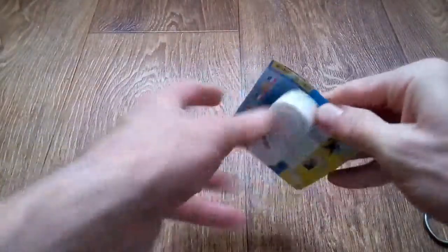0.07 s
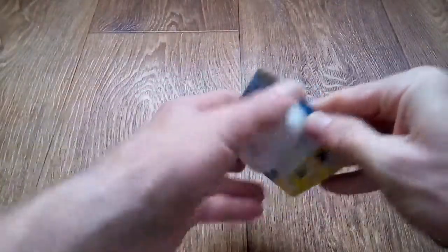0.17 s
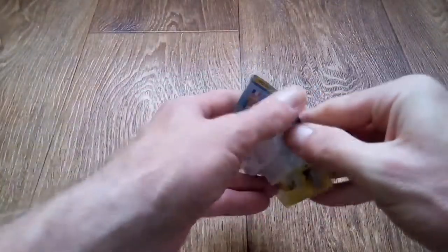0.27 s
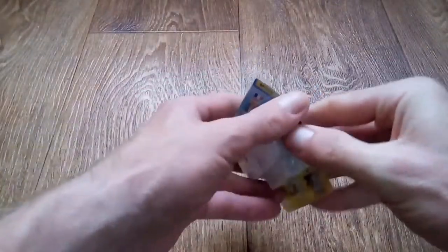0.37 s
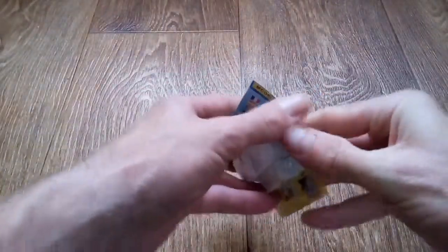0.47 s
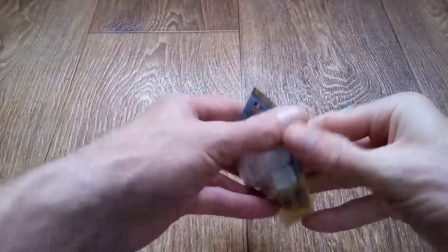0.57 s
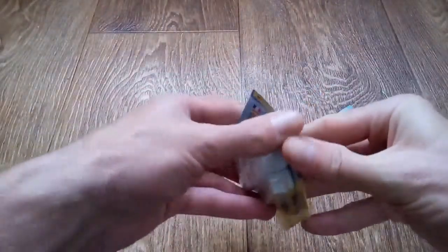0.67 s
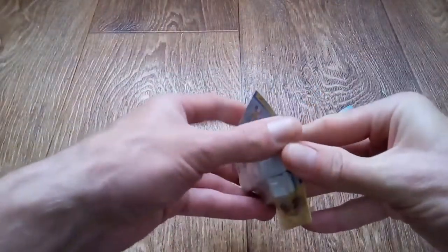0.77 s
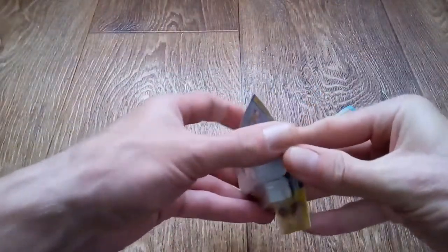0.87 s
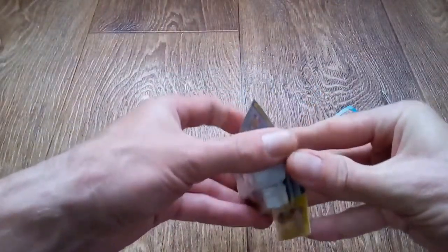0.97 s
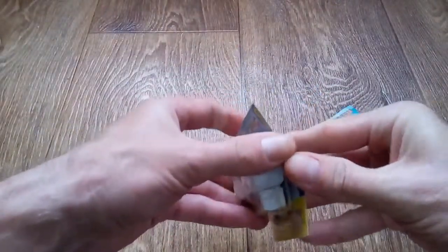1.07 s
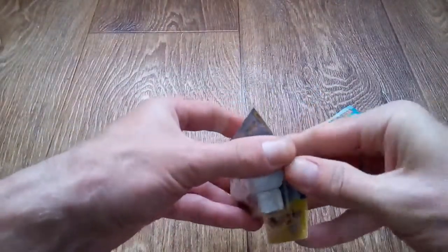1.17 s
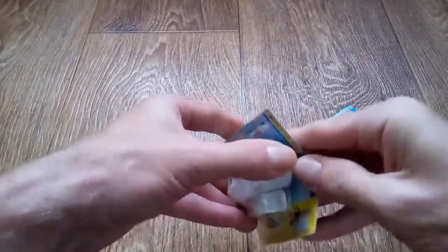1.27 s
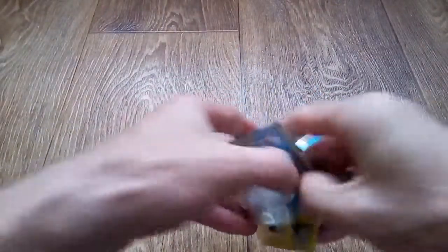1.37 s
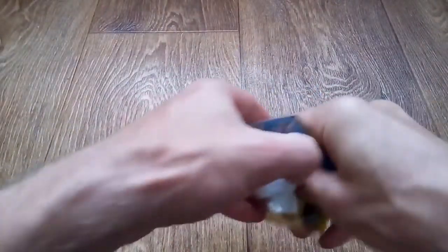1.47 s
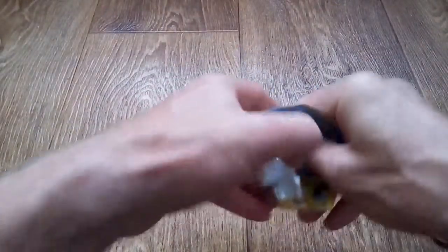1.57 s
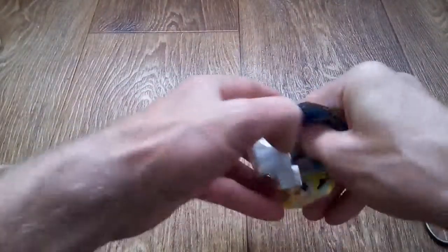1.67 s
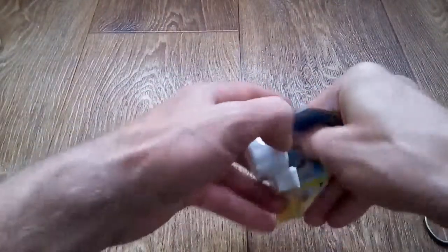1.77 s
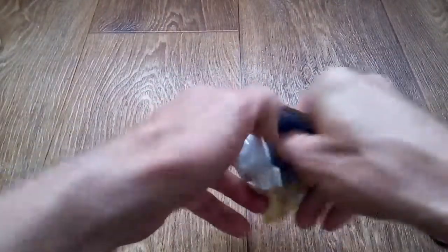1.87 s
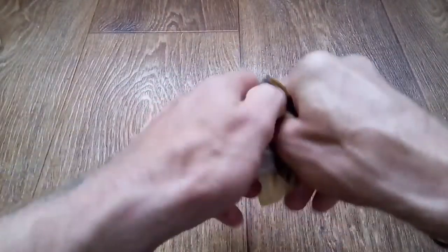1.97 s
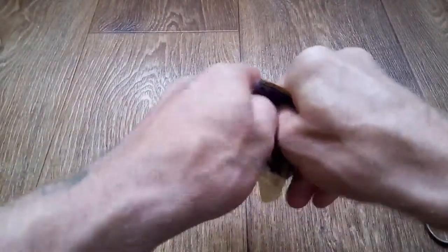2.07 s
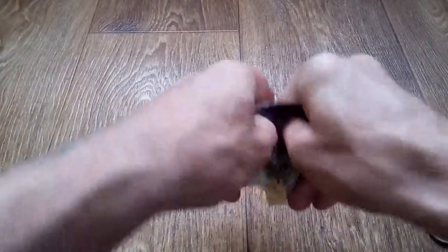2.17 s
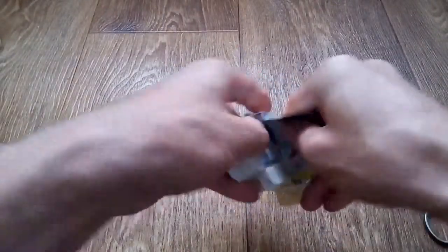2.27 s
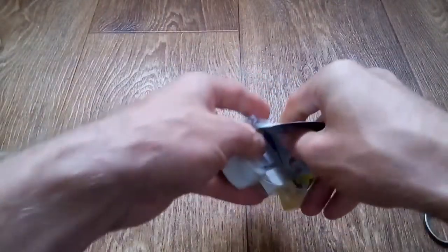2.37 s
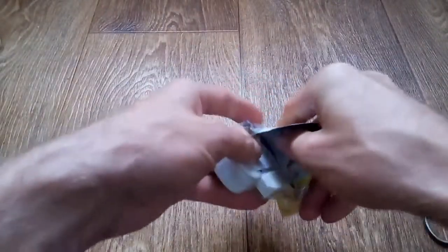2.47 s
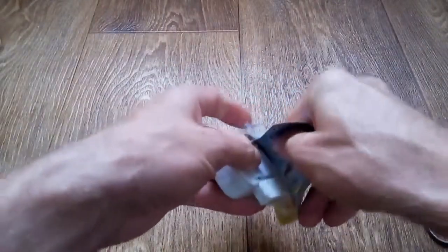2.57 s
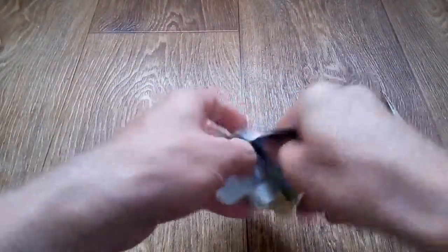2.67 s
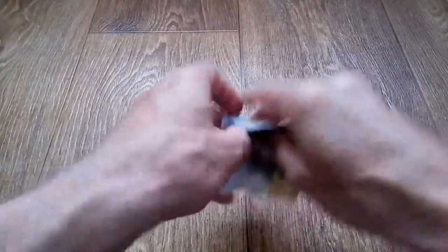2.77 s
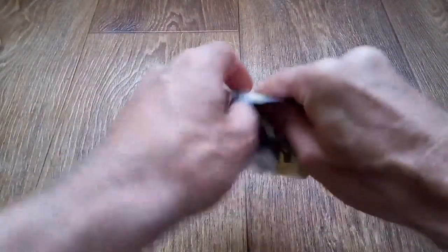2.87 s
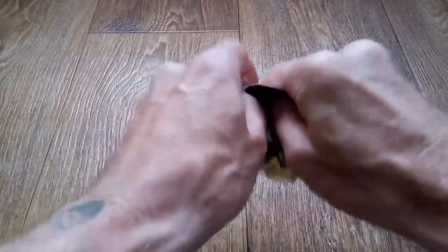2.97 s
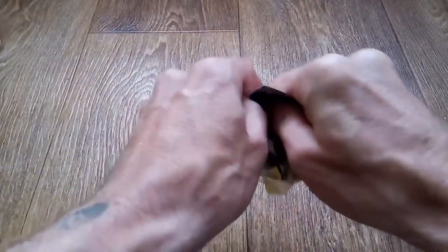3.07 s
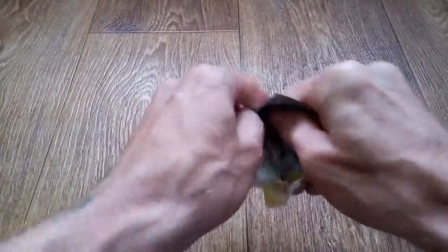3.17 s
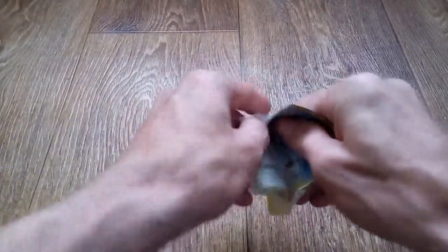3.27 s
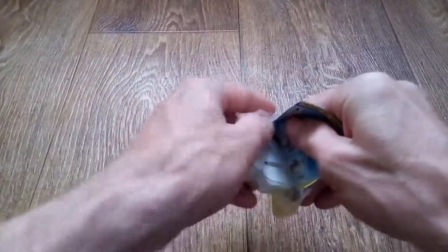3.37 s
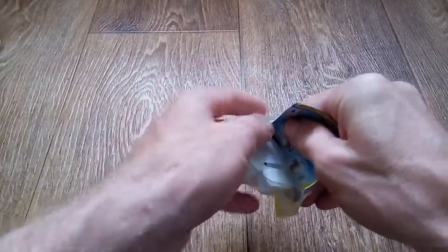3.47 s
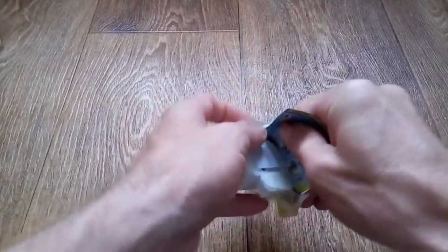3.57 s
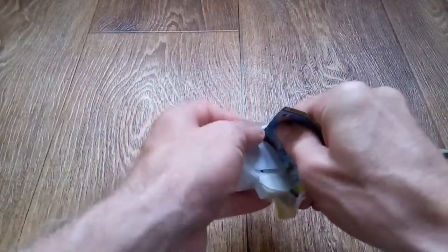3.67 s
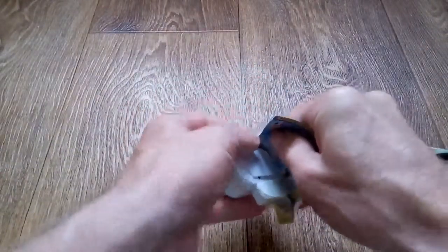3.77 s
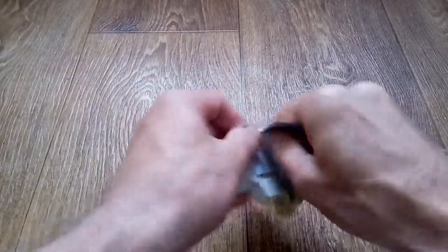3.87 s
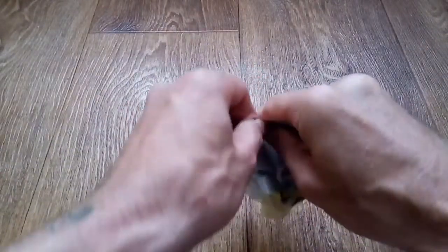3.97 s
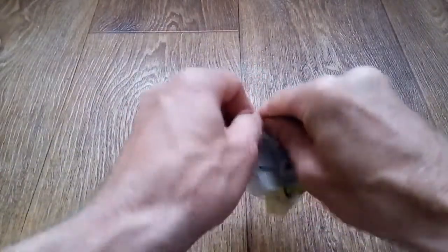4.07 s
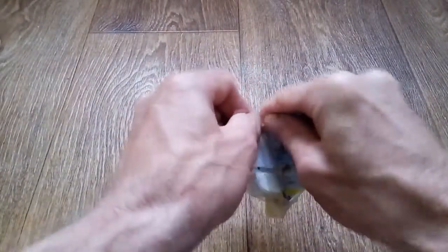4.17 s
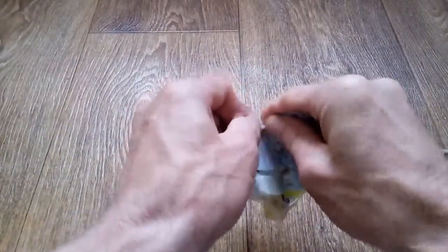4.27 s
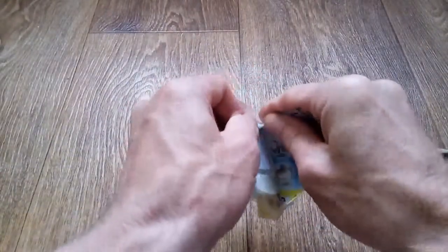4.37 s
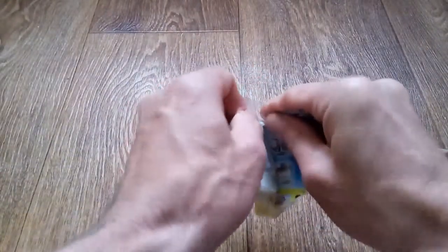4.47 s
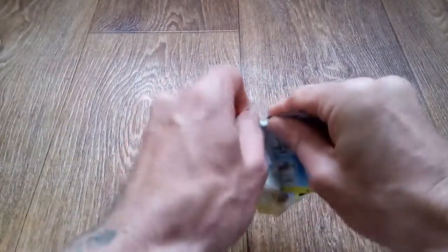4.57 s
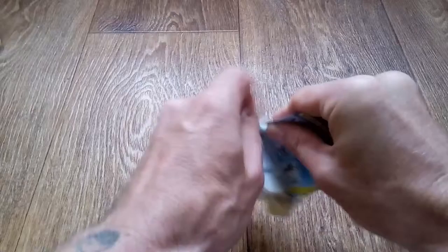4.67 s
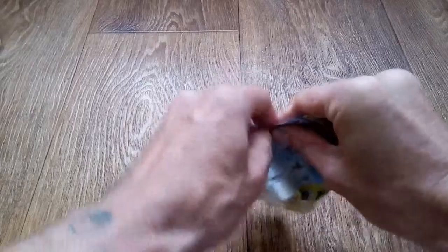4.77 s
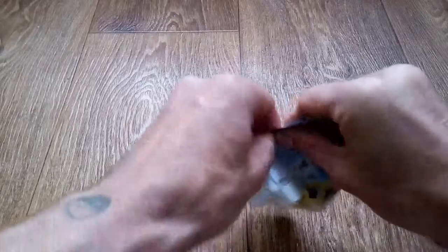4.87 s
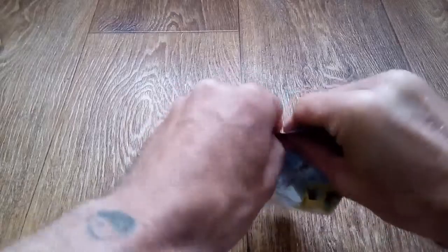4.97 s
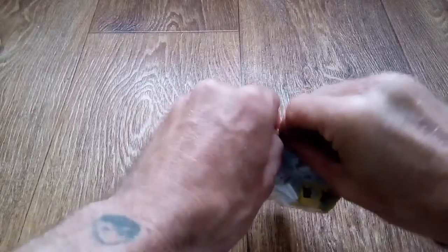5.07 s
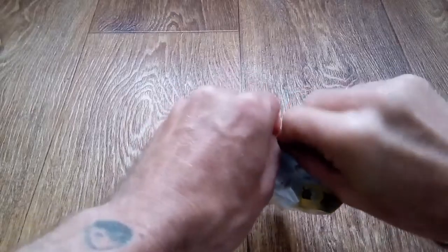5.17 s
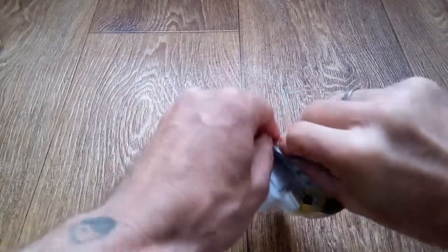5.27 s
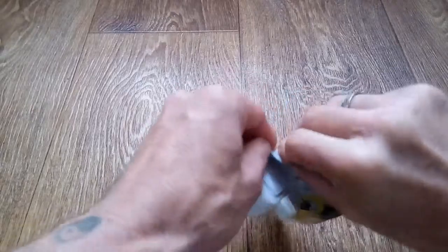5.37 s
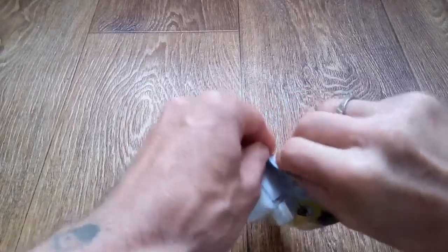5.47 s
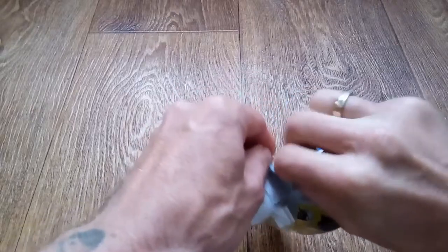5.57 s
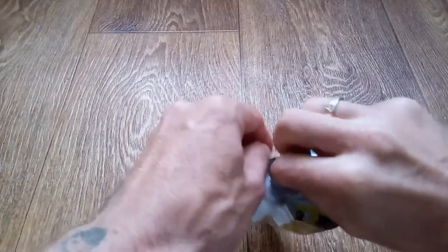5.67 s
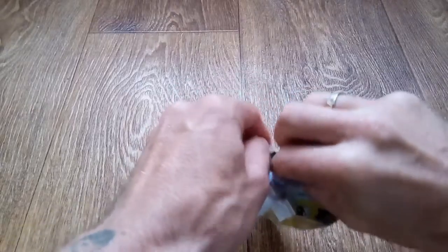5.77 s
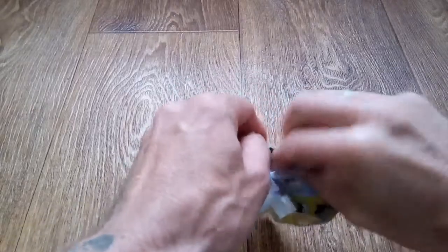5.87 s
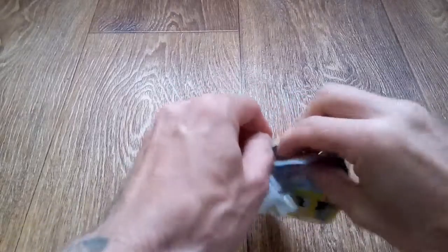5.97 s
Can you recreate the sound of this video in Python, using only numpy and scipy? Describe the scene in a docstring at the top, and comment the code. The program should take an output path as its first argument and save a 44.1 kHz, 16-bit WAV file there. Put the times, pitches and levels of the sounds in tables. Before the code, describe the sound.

Two hands pry a small plastic blister pack from its card. After a nearly silent second, bright snaps and crackles burst out, strongest just before two seconds and again near two and a half. Rustling continues, a short hissy finger slide comes after four seconds, then lighter ticks. Close small microphone, little bass, small room above a wooden floor.

```python
"""Creases of a small plastic blister pack snap as two hands pry it off its card, above a wooden floor.
Each snap is a click, a short crack and ringing panels, with a rattle and weaker snaps after it.
Fingers rub card and plastic: random slips and ticks set resonances ringing; one long slide hisses.
Low knocks are damped pushes of air. Floor and a small room answer with echoes and fading noise,
over rumble and a faint room tone made of filtered noise."""
import sys
import numpy as np
from scipy import signal
from scipy.fft import rfft, irfft
from scipy.io import wavfile
from scipy.ndimage import uniform_filter1d

SR = 44100
rng = np.random.default_rng(int(sys.argv[2]) if len(sys.argv) > 2 else 0)


def master_out(mix):
    """Clip the mix to full scale and print it as 16-bit PCM to the path in sys.argv[1]."""
    frames = np.transpose(np.atleast_2d(mix))
    ceiling = np.clip(frames, -1, 1)
    pcm = np.round(ceiling * 32767).astype(np.int16)
    wavfile.write(sys.argv[1], SR, pcm)


N = 265482  # length in samples

# Snaps of a crease. Each row: start in seconds, panel level in dB, panel pitch in Hz,
# crack level in dB, crack pitch in Hz, level of the sizzle above 8 kHz in dB.
CREASE_SNAPS = [(0.125,-59,596,-49,5500,-69),(0.218,-44,2100,-34.5,4280,-45),(0.477,-62,3400,-33.5,5200,-48),(0.484,-42.5,1940,-38,5100,-55),(0.577,-53,2140,-44,4640,-57),(0.657,-73,3740,-41,5440,-38),(0.685,-67,3850,-34,6500,-57),(0.895,-31,1825,-30.5,6300,-51),(1.102,-34.5,3140,-43.5,7200,-56),(1.184,-11.5,3090,-22.5,6100,-38),(1.219,-35,2920,-22.5,6550,-33),(1.25,-20,1790,-26,6550,-28),(1.31,-28,2000,-48,6580,-57),(1.348,-31.5,1420,-49,4500,-55),(1.362,-26,960,-26.5,5630,-45),(1.406,-18.5,2100,-48,6360,-53),(1.421,-25.5,710,-24.5,4650,-47),(1.432,-31,630,-34,4300,-50),(1.541,-17.5,3620,-27,5850,-33.5),(1.613,-23.5,1500,-66,3990,-54),(1.774,-43,3280,-29,6360,-38),(1.782,-0.5,1690,-4.5,6060,-8.5),(1.845,-18,1730,-16,4450,-27),(1.89,-18.5,3100,-17.5,6560,-23),(1.921,-13,2960,-13,6500,-20),(1.927,-16,1620,-15.5,6500,-18),(1.975,-23.5,910,-26.5,4500,-40),(2.078,-30,2050,-25.5,5440,-34),(2.084,-21.5,1970,-25,6550,-32),(2.092,-19.5,3330,-23.5,6500,-27),(2.124,-22,3720,-47,4000,-46),(2.221,-7.5,1720,-40,4460,-28),(2.239,-24,1600,-14,7300,-18.5),(2.343,-24.5,2220,-57,3930,-57),(2.487,-2,3180,-7,6000,-25),(2.4892,-24,640,-20.5,4400,-28),(2.696,-28,1940,-57,4160,-52),(2.713,-26,977,-45,6630,-54),(2.734,-26.5,890,-35.5,5260,-56),(2.81,-26,1480,-36,5400,-49),(2.823,-23.5,602,-56,6240,-50),(2.831,-25.5,1920,-24.5,6440,-31),(2.887,-16.5,1580,-56,4600,-49),(2.924,-21,634,-23,4600,-33.5),(3.06,-19.5,3750,-15,6500,-26),(3.103,-26.5,840,-43,4650,-54),(3.125,-22.5,855,-49,5490,-46),(3.134,-36,720,-34,5500,-49),(3.191,-13.5,1570,-23,5500,-32),(3.195,-24,1540,-13.5,4550,-19),(3.285,-43,1580,-29,6000,-56),(3.321,-37.5,1750,-33,5800,-50),(3.441,-40,3370,-41,6740,-63),(3.457,-38,1380,-45,6400,-65),(3.478,-61,3320,-37,4430,-63),(3.502,-29.5,1466,-31.5,4940,-64),(3.667,-40,3460,-25.5,5720,-20.5),(3.792,-29,2410,-52,5860,-51),(3.8,-26,3350,-32,6500,-47),(3.831,-21,2650,-24.5,6150,-32),(3.86,-13.5,2180,-38,4500,-31),(3.907,-20.5,1740,-48,5400,-52),(3.94,-27,2040,-50,5110,-52),(3.952,-30,1510,-28,5840,-45),(3.958,-17.5,1750,-25.5,5500,-43),(4.035,-21,1920,-9,6300,-21),(4.04,-23.5,3370,-19.5,6070,-30),(4.049,-11,2440,-33,6470,-37),(4.078,-15,1450,-24,6100,-28),(4.146,-26.5,3870,-21,5200,-54),(4.154,-20,1380,-29,5350,-52),(4.439,-31.5,2110,-36,6670,-52),(4.5,-23.5,3450,-24.5,6500,-65),(4.514,-27,1550,-37,5800,-63),(4.585,-26.5,1810,-61,6450,-62),(4.654,-36,784,-39,5500,-46),(4.671,-30,1580,-53,5500,-58),(4.691,-23,2070,-25,5100,-42),(4.696,-33,1970,-37,5830,-40),(4.718,-49,1610,-23,6770,-28),(4.835,-26,1580,-50,5780,-57),(4.844,-27,1720,-55,5440,-50),(4.852,-41,1880,-31,7440,-34),(4.86,-31,1850,-23,3950,-41),(4.883,-32,1430,-23.5,4240,-35),(4.906,-32,1600,-29,5940,-46),(4.974,-23.5,1970,-31,4130,-39),(4.976,-20.5,976,-61,4000,-52),(4.997,-28.5,1020,-56,4570,-59),(5.22,-32.5,652,-65,3850,-54.5),(5.237,-43,710,-39.5,7450,-34),(5.315,-35,1070,-30,6120,-56),(5.34,-31.5,1780,-44,6570,-60),(5.384,-31,940,-34.5,5500,-47),(5.404,-39,3430,-29,6900,-48),(5.434,-32.5,1630,-42,6500,-54),(5.503,-35,4050,-37,5730,-48),(5.551,-32,1620,-33.5,4200,-46),(5.568,-32,1570,-28,7850,-27.5),(5.629,-37,3770,-26,5700,-54),(5.635,-40,3800,-29.5,4240,-31),(5.782,-35.5,1025,-40,4730,-54),(5.878,-43,3690,-33.5,6500,-42),]
# Fingers working the pack. Each row: time in seconds, rub level in dB,
# share of dull card sound in dB, share of hollow shell sound in dB.
FINGER_RUB = [(0, -68, 11.5, 0), (0.17, -89, -26, -15), (0.4, -80, -10, -19), (0.6, -84, 4, -9),
              (0.95, -72, -20, 1), (1.065, -101, 0, 2), (1.078, -82, -7, 20), (1.15, -75, 10, 2),
              (1.19, -68, 14, -14), (1.4, -57, 9, 4), (1.7, -77, 1, -1), (1.88, -60, 3.5, 9.5),
              (2.15, -69, 19.5, 8), (2.4, -75, 23, -9), (2.6, -59, -20, 0), (2.78, -60.5, 9, 1),
              (2.85, -56, -1, -5), (3.04, -76, 19, 7), (3.18, -69, 15, 4), (3.42, -77, 10, 1),
              (3.65, -73.5, 5, -25), (4.0, -49.5, -2.5, -3), (4.2, -59, -1, -1), (4.37, -58, -4.5, -4),
              (4.62, -68.5, 13.5, -7), (4.87, -58.5, 6.5, -4), (5.12, -68.5, 5, -28),
              (5.22, -70.5, -9, -20), (5.3, -82, -12, -18), (5.36, -66.5, 11.5, -2), (5.5, -56, 3, 5),
              (5.54, -69, 16, -2), (5.6, -51.5, 6.5, -11), (5.7, -60.5, -2.5, -13), (5.8, -54, 5.5, 4.5),
              (5.87, -69.5, 7, -7), (6.02, -65.5, 13, 3)]


def undb(db):
    """Turn decibels into a plain gain."""
    return 10 ** (np.asarray(db) / 20)


def unit(x):
    """Scale to an average strength (rms) of 1."""
    return x / np.sqrt(np.mean(x ** 2))


def band(x, hz, width):
    """Ring one resonance: a two-pole filter with gain 1 at its centre."""
    return signal.lfilter(*signal.iirpeak(min(hz, .45 * SR), hz / width, SR), x)


def curve(table):
    """Draw straight lines between the rows of a table: one value a sample for each column."""
    s, *columns = np.transpose(table)
    return [np.interp(np.arange(N) / SR, s, c) for c in columns]


def walk(rate):
    """Wander by chance: random levels, each held for 1 / rate seconds, smoothed twice; spread near 1."""
    hold = int(SR / rate)
    steps = np.repeat(rng.standard_normal(N // hold + 1), hold)
    return 0.73 * uniform_filter1d(uniform_filter1d(steps, hold), hold)[:N]


def lay(s, rows, db):
    """Place one row of sound at each time, each with its own peak level."""
    out = np.zeros(N + rows.shape[1])
    places = (s * SR).astype(int) + np.arange(rows.shape[1])
    # add.at lets sounds overlap
    np.add.at(out, places, undb(db) * rows / np.max(np.abs(rows), axis=1, keepdims=True))
    return out[:N]


def room_tone():
    """Faint noise rings in a few resonances whose levels waver."""
    # Each row: resonance in Hz, width of its first, narrower filter in Hz, middle level in dB.
    tone_rows = [(58.5, 54, -72.5), (307.5, 38, -64.5), (686, 36, -69)]
    out = 0
    for hz, width, db in tone_rows:
        ring = band(band(rng.standard_normal(N), hz, width), hz, 3 * width)
        out = out + undb(db + 7.2 * walk(15)) * unit(ring)
    return out


def rumble():
    """Two low bands of noise, each a pair of broad wavering resonances, swell now and then."""
    # Each row: time of full strength in seconds, hold in seconds,
    # strength of the lower band in dB, strength of the upper band in dB.
    swell_rows = [(0.214, 0.26, -51.5, -52), (1.414, 0.023, -50.5, -47.5), (4.075, 0.022, -54, -46),
                  (5.624, 0.084, -53, -40.5)]
    # Level that stays between swells, in dB: lower band, upper band.
    floor_levels = (-84, -83)
    rise_db_per_s, fall_db_per_s = 125, 68
    t = np.arange(N) / SR
    start, hold, *levels_db = np.transpose(swell_rows)[:, :, None]
    rise_db = -rise_db_per_s * np.maximum(start - t, 0)
    fall_db = -fall_db_per_s * np.maximum(t - start - hold, 0)
    out = 0
    for db, floor_db, pair_hz in zip(levels_db, floor_levels, ((110, 169), (312, 382))):
        noise = 0
        for hz in pair_hz:
            ring = unit(band(band(rng.standard_normal(N), hz, 62), hz, 62))
            noise = noise + ring * undb(1.4 * walk(3.3))
        swell = undb(db + rise_db + fall_db - 6.0).sum(axis=0)
        out = out + noise * (undb(floor_db) + swell)
    return out


def room(x, rise_s=0.00045):
    """Pass the direct sound, add two early echoes, then a noise tail whose bands fade at their own speeds."""
    # First echoes off the floor and a nearby wall. Each row: delay in seconds, strength in dB.
    echo_rows = [(.0022, -10), (.0065, -7.5)]
    # Fading tail. Each row: band centre in Hz, time to fall by 60 dB in seconds, strength in dB.
    tail_rows = [(225, 0.19, 18), (795, 0.57, 1), (1780, 0.12, 5.5), (4160, 0.27, 8.5), (9500, 0.068, 12),
                 (13100, 0.37, 1.5)]
    t = np.arange(SR // 2) / SR
    tail = 0
    for hz, t60, db in tail_rows:
        noise = unit(band(rng.standard_normal(len(t)), hz, hz))
        tail = tail + undb(db - 60 * t / t60) * noise * np.sqrt(hz) / SR
    response = tail * 10 * (1 - np.exp(-(t / rise_s) ** 2))
    response[0] = 1
    for delay_s, db in echo_rows:
        # two samples share each echo, which softens it
        response[int(delay_s * SR):][:2] += undb(db) / 2
    return signal.fftconvolve(x, response)[:N]


def thump(hz):
    """A damped push of air that dies away within about one cycle."""
    push = 2 * np.pi * hz * np.arange(SR // 40) / SR
    return np.sin(push) * np.exp(-push / 6.5)


def knocks():
    """A finger knocks dully on the pack: each knock is one low push of air."""
    # Each row: start in seconds, peak level in dB, pitch in Hz.
    knock_rows = [(1.166, -32, 230), (1.365, -24.5, 218), (1.424, -28.5, 254), (1.7805, -24, 129)]
    s, db, hz = np.transpose(knock_rows)[:, :, None]
    return lay(s, thump(hz), db)


def slide():
    """A finger slides over the film: very dense slips make a bright hiss in its resonances."""
    # Each row: time in seconds, level in dB.
    slide_levels = [(4.1, -70), (4.2, -56), (4.3, -49.5), (4.38, -50), (4.41, -59), (4.455, -54.5),
                    (4.48, -85)]
    # Resonances of the film. Each row: centre in Hz, filter width in Hz, middle level in dB.
    slide_modes = [(1780, 1500, 0), (4500, 1500, -3), (6500, 2000, -1), (10300, 740, -8.5),
                   (13300, 4500, -11.5)]
    slips = rng.standard_normal(N) * undb(3.4 * rng.exponential(size=N))
    ring = 0
    for hz, width, db in slide_modes:
        mode = unit(band(band(slips, hz, width), hz, width))
        ring = ring + undb(db + 3.1 * walk(25.15)) * mode
    s = np.arange(N) / SR
    sliding = (s > slide_levels[0][0]) * (s < slide_levels[-1][0])
    return unit(ring) * undb(curve(slide_levels)[0]) * sliding


def rubbing(slips_per_s=900, ticks_per_s=140, tick_db=1, flicker_db=4.5, hiss=0.17):
    """Dense uneven slips of skin and sparser ticks of film ring plastic and card, in fits and starts."""
    # Resonances of the rubbed film, the card and the hollow blister shell.
    # Each row: centre in Hz, width in Hz before a shared widening, middle level in dB.
    film_modes = [(5500, 3560, 14), (6470, 390, -5.5), (10300, 16000, 7)]
    card_modes = [(756, 234, 13), (1560, 650, 14), (2040, 120, -7)]
    shell_modes = [(3190, 1100, 0)]
    widening, colour_db = 1.37, 3
    db, card_db, shell_db = curve(FINGER_RUB)
    tick_size = undb(np.minimum(3.5 * rng.exponential(size=N), 11))
    tick_size = tick_size * np.sign(rng.standard_normal(N))
    ticks = unit(tick_size * (rng.random(N) < ticks_per_s / SR)) * undb(tick_db)
    fits_db = flicker_db * walk(30)
    # the thin film sends out little below its lowest resonance
    thin = signal.butter(3, 3400, "high", fs=SR, output="sos")
    out = 0
    for body, share_db in ((film_modes, 0), (card_modes, card_db), (shell_modes, shell_db)):
        slips = unit(rng.standard_normal(N) * (rng.random(N) < slips_per_s / SR))
        touch = slips + hiss * rng.standard_normal(N) + ticks
        ring = 0
        for hz, width, mode_db in body:
            mode = unit(band(band(touch, hz, widening * width), hz, widening * width))
            ring = ring + undb(mode_db) * mode * undb(colour_db * walk(26.11))
        if body is film_modes:
            ring = signal.sosfilt(thin, ring)
        out = out + unit(ring) * undb(share_db + fits_db + 0.5 * walk(42))
    return out * undb(db)


def crinkles(count=480, over_rub_db=8.5, spread_db=9, middle_hz=1600, spread_octaves=0.63):
    """Small crinkles come by chance, louder while fingers rub harder; rows like CREASE_SNAPS."""
    s = rng.random(count) * (N - 1) / SR
    chance = rng.standard_normal((count, 5)).T
    rub_db = curve(FINGER_RUB)[0][(s * SR).astype(int)]
    panel_db, crack_db = rub_db + over_rub_db + spread_db * np.clip(chance[[0, 1]], -3, 2)
    hz = np.clip(middle_hz * 2 ** (spread_octaves * chance[2]), 500, 5000)
    crack_hz = np.clip(5500 * 2 ** (0.34 * chance[3]), 3500, 9000)
    # the sizzle lies under the crack
    sizzle_db = crack_db - 8.5 + 0.5 * chance[4]
    return np.transpose([s, panel_db, hz, crack_db, crack_hz, sizzle_db])


def afters(count=2, wait_s=.011, after_db=-17, spread_db=2.5):
    """Each crease settles in a few weaker, stuttering snaps of nearby pitch; rows like CREASE_SNAPS."""
    rows = np.repeat(np.array(CREASE_SNAPS, float), count, axis=0)
    chance = rng.standard_normal((len(rows), 5))
    wait = 0.0036 + wait_s * np.abs(chance[:, 0])
    db = after_db + spread_db * np.clip(chance[:, 1:3], -2, 1)
    detune = np.exp(0.19 * chance[:, 3:])
    s, panel_db, hz, crack_db, crack_hz, sizzle_db = rows.T
    return np.transpose([s + wait, panel_db + db[:, 0], hz * detune[:, 0], crack_db + db[:, 1],
                         crack_hz * detune[:, 1], sizzle_db + db[:, 1]])


def snaps(rows, rattle_peak_s=0.0008, crack_ring_s=0.00022, broad_db=-5, click_db=-10,
          push_hz=200, give_s=.0008):
    """A crease buckles: a click, ringing panels and a push of air, with a rattle of the loose pack.
    Returns what fills the room and what is heard only close by."""
    s, panel_db, hz, crack_db, crack_hz, sizzle_db = np.transpose(rows)[:, :, None]
    # a weak snap gives way slowly: a duller click and a longer rattle
    soft = np.clip((-17.5 - np.maximum(crack_db, panel_db)) / 16, 0, 1)
    t = np.arange(SR // 40) / SR
    chance = rng.standard_normal((len(rows), 7))
    # low panels thump more
    thump_db = panel_db - 28 - 5.5 * np.log2(hz / 1500)

    panel = 0
    for k in range(4):
        # the first mode is the heard pitch, weaker neighbours lie by chance around it
        mode_hz = hz * np.exp(.27 * chance[:, [k]] * (k > 0))
        # low modes and weak snaps ring longer
        fade = np.exp(-t / (.0013 * (1 + soft)) * np.sqrt(mode_hz / 1500))
        attack = np.clip(t * mode_hz / (soft + .05), 0, 1)
        panel = panel + undb(-9.5 * (k > 0)) * fade * attack * np.sin(2 * np.pi * mode_hz * t)
    panel = signal.sosfilt(signal.butter(2, 350, "high", fs=SR, output="sos"), panel)
    # the rattle is random shaking that keeps the same modes ringing
    shake = rng.standard_normal((len(rows), len(t))) * t
    shake = shake * np.exp(-t / (rattle_peak_s * (1 + 0.84 * soft)))
    ringing = signal.fftconvolve(panel, shake, axes=1)[:, :len(t)]
    # the crease creaks for a moment before it gives way
    gives = np.clip(s + give_s, 0, (N - 1) / SR)
    panel = lay(gives, panel, panel_db)
    # flexing panels push and pull the air at once, so the room gets only part of their ring
    far = undb(-9) * panel
    push = thump(push_hz * np.exp(0.14 * chance[:, [4]]))
    near = panel - far + lay(s, ringing, panel_db - 7.0) + lay(s, push, thump_db)

    click = np.sign(chance[:, [5]]) * (t == 0)
    parts = ((panel_db + click_db - 7 * soft, (500, 4000), "band"),
             (crack_db + broad_db - 5 * soft, (3300, 8000), "band"),
             (sizzle_db, 8000, "high"))
    for db, edges, kind in parts:
        sos = signal.butter(2, edges, kind, fs=SR, output="sos")
        tick = lay(gives, signal.sosfilt(sos, click), db + 1.5 - 0.5 * soft)
        # the sizzle beams at the microphone and reaches the walls weaker
        spread = undb(-6 * (kind == "high"))
        far = far + spread * tick
        near = near + (1 - spread) * tick
        # the treble of the rattle dies first
        rattle = shake * np.exp(-t / .0025 * (kind == "high"))
        near = near + lay(s, signal.sosfilt(sos, rattle), db)

    # each crack rings briefly at its own pitch and a lower neighbour; a weak one rings longer
    neighbour_hz = crack_hz * (0.746 + 0.049 * chance[:, [6]])
    pair = np.sin(2 * np.pi * crack_hz * t) + 0.42 * np.sin(2 * np.pi * neighbour_hz * t)
    crack = np.exp(-t / (crack_ring_s * (1 + 0.72 * soft))) * pair
    far = far + lay(gives, crack, crack_db - 7.5 - 0.65 * soft)
    crack_rattle = signal.fftconvolve(crack, shake, axes=1)[:, :len(t)]
    near = near + lay(s, crack_rattle, crack_db - 0.5)
    return far, near


def scene():
    """The pack in the room, over rumble and room tone."""
    far, near = snaps(np.vstack([CREASE_SNAPS, afters(), crinkles()]))
    rub = rubbing()
    rub_far_share = 0.56  # part of the rubbing that reaches the walls
    in_room = room(far + rub_far_share * rub + slide())
    close_by = near + (1 - rub_far_share) * rub + knocks()
    return (in_room + close_by + rumble() + room_tone())[None]


def record(dry):
    """The small microphone peaks in the treble, rounds the loudest snaps and cuts the top."""
    # Microphone colour. Each row: frequency in Hz, gain in dB.
    mic_colour = [(30, -15.5), (200, -8), (3000, -2.5), (6400, 3.5), (7600, -1), (8300, -1.5), (12000, 2.5),
                  (15600, -1.5), (16200, -38)]
    top_hz = 16900
    hz, db = np.transpose(mic_colour)
    bins_hz = np.arange(1, 514) * SR / 1024
    log_gain = np.log(10) / 20 * np.interp(np.log(bins_hz), np.log(hz), db)
    cepstrum = irfft(log_gain)
    # folding the cepstrum makes the filter respond only after a sound, never before it
    cepstrum[1:512] *= 2
    cepstrum[513:] = 0
    coloured = signal.lfilter(irfft(np.exp(rfft(cepstrum)))[:512], 1, dry)
    rounded = 0.96 * np.tanh(coloured / 0.81)
    return signal.sosfilt(signal.ellip(8, .2, 70, top_hz, fs=SR, output="sos"), rounded)


dry = scene()
out = record(dry)
master_out(out)
```